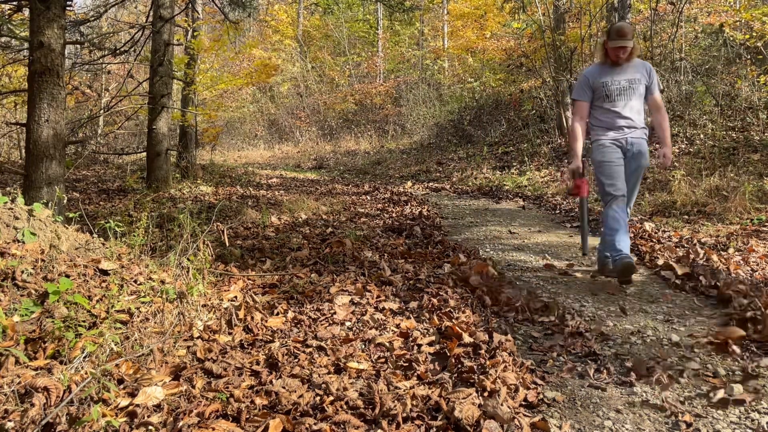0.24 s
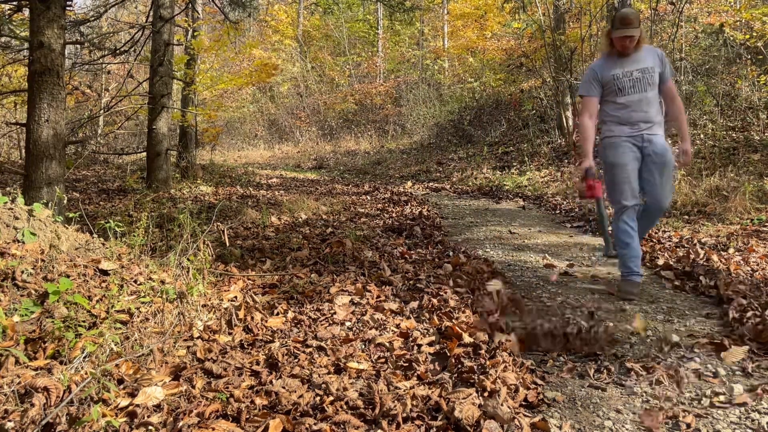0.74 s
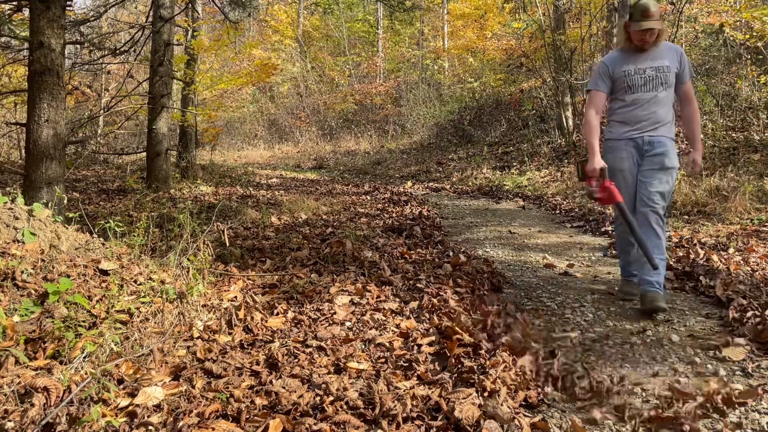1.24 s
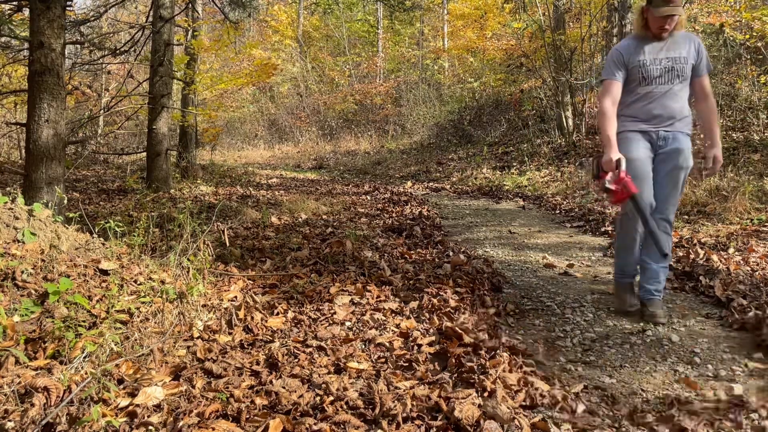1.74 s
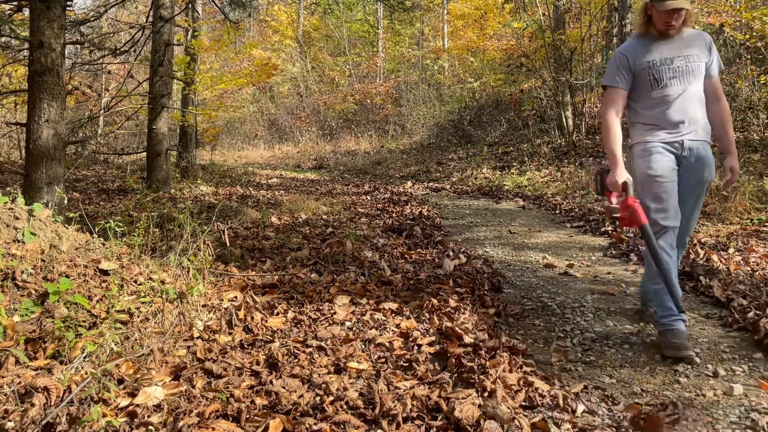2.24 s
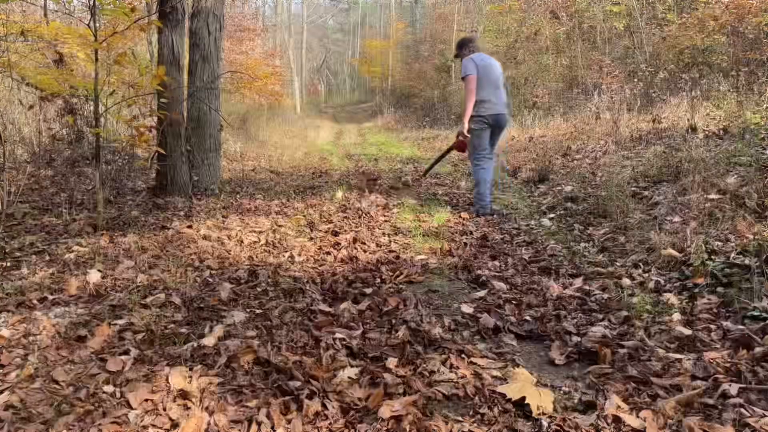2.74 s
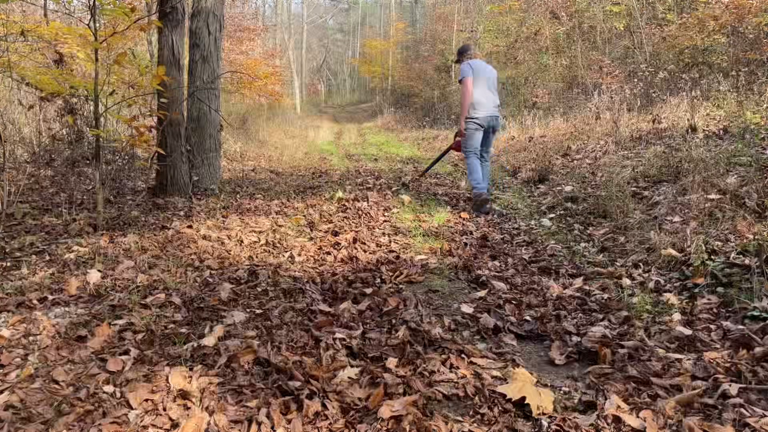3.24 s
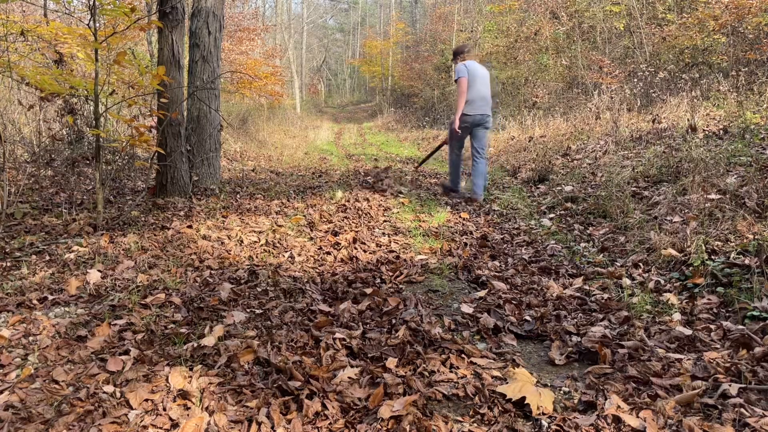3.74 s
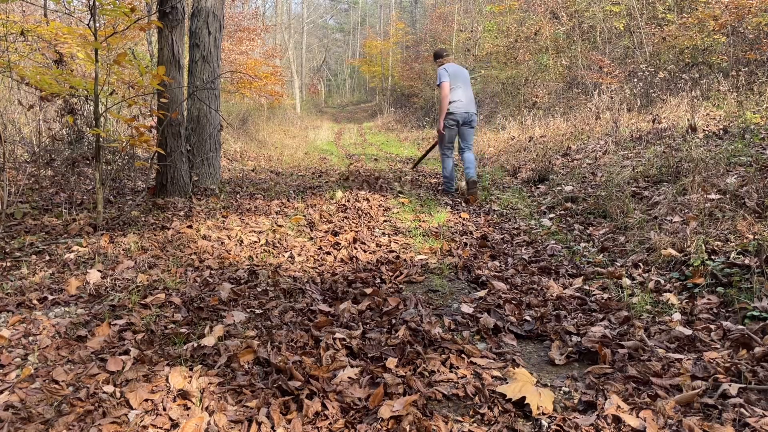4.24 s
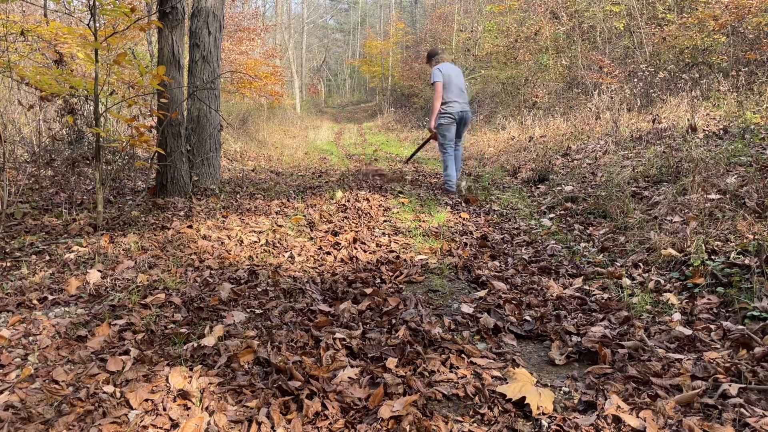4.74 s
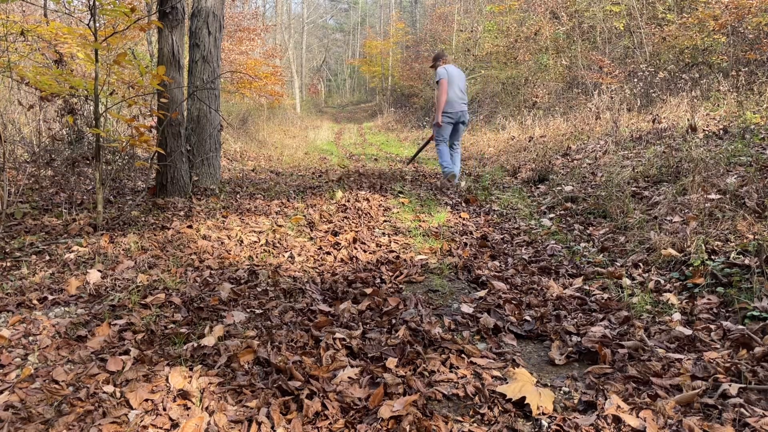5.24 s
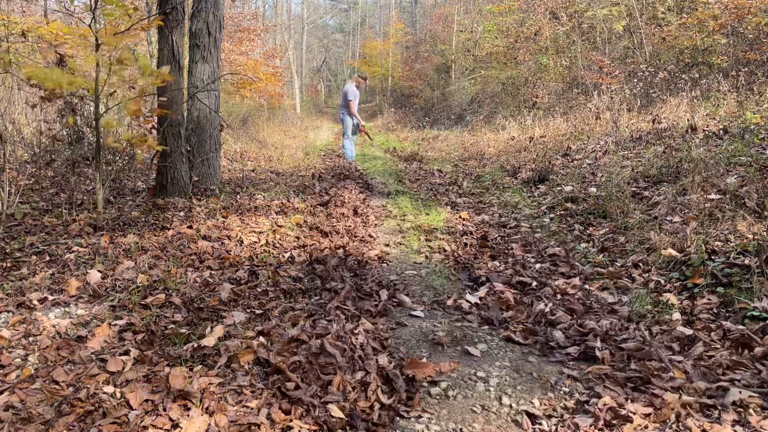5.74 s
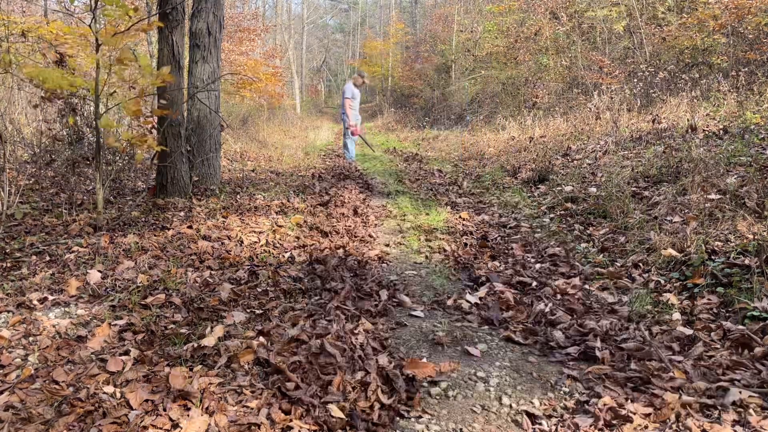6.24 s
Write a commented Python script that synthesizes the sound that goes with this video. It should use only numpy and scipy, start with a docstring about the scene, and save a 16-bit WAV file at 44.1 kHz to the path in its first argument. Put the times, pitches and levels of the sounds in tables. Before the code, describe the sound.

A battery leaf blower runs continuously on a woodland path, heard from three distances with hard jumps between. From 0 to about 2.5 seconds it is close and loud: a dense, gusty rush of air with a resonant tube colour, its tone sweeping as the nozzle swings. A hooting ground roar flares near 0.2 and 1.2 seconds, a whine around 2.7 kHz stands out early and near 1.7, and a hollow moan comes and goes. Dry leaves hiss and tick; a low engine-like drone swells near 2 seconds over dull rumble. At 2.5 it abruptly drops, more distant, with softer air, fluctuating whine until about 4.6, and fading leaf rustle. It dips near 3.5, partly recovers around 4, and wavers. At 5.4 another sudden drop leaves a thin, faraway rush over faint drone, rising slightly until the end at 6.5.

```python
"""On a woodland path a battery leaf blower clears dry leaves, in three shots joined by hard cuts: walking up
close, walking away, and far off. The jet is noise coloured by the blower tube and combed by its own ground echo,
which sweeps as the nozzle swings; bands of noise make its roar on the ground and the fan's intake hiss.
Sines make the fan's hum and whine, a hollow moan and a far engine's drone over a dull rumble;
blown leaves are treble hiss sprinkled with short ticks."""
import sys
import numpy as np
from scipy import signal
from scipy.fft import rfft, irfft, next_fast_len
from scipy.io import wavfile
from scipy.ndimage import uniform_filter1d

SR = 44100
rng = np.random.default_rng(int(sys.argv[2]) if len(sys.argv) > 2 else 0)


def master(y):
    """Save y as 16-bit WAV."""
    cut = np.clip(np.atleast_2d(y).T, -1, 1)
    pcm = np.round(cut * 32767)  # scale
    wavfile.write(sys.argv[1], SR, pcm.astype(np.int16))


N = 285768
T = np.arange(N) / SR
HOP = 512  # samples between noise frames
HZ = np.fft.rfftfreq(4 * HOP, 1 / SR)
FRAME_S = np.arange(N // HOP + 5) * HOP / SR
RUSH_FROM_HZ, RUSTLE_FROM_HZ = 1000, 8700  # the rush level is set above the first; leaf hiss takes over at the second


def gain_of(db):
    """Decibels to amplitude."""
    return 10 ** (np.asarray(db) / 20)


def evened(x):
    """Scales to rms 1."""
    return x / np.sqrt(np.mean(x ** 2) + 1e-20)


def unit_power(power, band):
    """Scales a power spectrum so that the band sums to 1."""
    return power / power[band].sum()


def follow(rows, t):
    """The columns of a curve table at times t, in straight lines from point to point."""
    s, *columns = np.transpose(rows)
    return [np.interp(t, s, c) for c in columns]


def read(points, hz, order=0):
    """One column of a spectrum table on a log-frequency axis."""
    f, *columns = np.transpose(points)
    return np.interp(np.log(hz + 1), np.log(f + 1), columns[order])


def drift(rate_hz):
    """Slow random wander of rms 1: white noise under a Gaussian lowpass."""
    n = next_fast_len(N)
    lowpass = np.exp(-(np.fft.rfftfreq(n, 1 / SR) / rate_hz) ** 2)
    return evened(irfft(rfft(rng.standard_normal(n)) * lowpass, n)[:N])


def patches(size):
    """A random field of rms 1 over frames and bins, smooth over size = (frames, bins)."""
    field = rng.standard_normal((len(FRAME_S), len(HZ)))
    smooth_in_time = uniform_filter1d(field, size[0], 0)
    return evened(uniform_filter1d(smooth_in_time, size[1], 1))


# Air columns of the tube and fan housing. Each row: centre in Hz, width at half the lift in Hz,
# lift in dB before the shot's ring and the treble damping scale it.
TUBE_RESONANCES = [(760, 95, 1.4), (955, 106, 1.2), (1201, 122, 3.3), (1399, 128, 3.5), (1681, 111, 2.7),
                   (1894, 79, 4.2), (2138, 72, 3.4), (2280, 105, 5.0), (2489, 80, 6.0), (2700, 159, 4.5),
                   (2947, 111, 5.0), (3055, 98, 3.7), (3269, 92, 5.0), (3493, 117, 4.8), (3631, 155, 4.3),
                   (3795, 135, 4.1), (4028, 165, 3.5), (4295, 78, 3.4), (4509, 124, 1.9), (4871, 203, 6.9),
                   (5046, 229, 5.0), (5452, 153, 2.4), (5587, 150, 1.9), (5922, 227, 6.5), (6155, 219, 4.7),
                   (6656, 192, 8.4), (6864, 232, 5.7), (7455, 163, 4.3)]


def tube_power(shot, ring=(1.45, 1, .95), damp_hz=(3600, 7500, 9500)):
    """Resonances of the air in the tube; the open nozzle reflects less treble, so the upper ones are flatter."""
    lift_db = sum(lift * .5 ** ((2 * (HZ - hz) / width) ** 2) for hz, width, lift in TUBE_RESONANCES)
    return gain_of(ring[shot] * lift_db / np.sqrt(1 + (HZ / damp_hz[shot]) ** 2)) ** 2


def hump(tube, db, hz, octaves):
    """Power spectrum of a band of noise around hz, coloured by the tube."""
    power = tube * np.exp(-.5 * (np.log2((HZ + 1) / hz) / octaves) ** 2)
    return power / power.sum(axis=-1, keepdims=True) * gain_of(db) ** 2


# Turbulence of the bare jet. Each row: frequency in Hz, then relative density in dB per Hz
# close, walking away, far off.
TURBULENCE_SPECTRUM = [(151, -16.5, -7.5, -4.5), (260, -13, -5.5, -4), (383, -4.5, -6.5, 0),
                       (580, -6, -11.5, -4), (970, -7, -4, -3.5), (1370, -9.5, -7, -6),
                       (1880, -8.5, -10.5, -8), (2240, -9.5, -8.5, -5.5), (3020, -10, -7.5, -6),
                       (3870, -9.5, -13, -9), (4740, -13.5, -15, -10.5), (5450, -10, -12, -5),
                       (6560, -12.5, -15.5, -8.5), (7900, -15.5, -21, -18), (8300, -18.5, -21, -14),
                       (9000, -13.5, -13.5, -12), (12040, -21.5, -25.5, -23.5), (13600, -31, -27, -33),
                       (14900, -31.5, -39, -34)]


def jet_colour(shot, tube):
    """Turbulence spectrum as the tube colours it."""
    return gain_of(read(TURBULENCE_SPECTRUM, HZ, order=shot)) ** 2 * tube


# Jet level as aim and distance change, one curve a shot. Each row: time in seconds, level in dB before trim.
RUSH_LEVEL = [
    [(0, -24), (.6, -23), (1.0, -25), (1.18, -23), (1.43, -27), (1.7, -21), (1.92, -21), (2.12, -25.5),
     (2.28, -22.5), (2.46, -21.5)],
    [(2.46, -29.5), (2.85, -27.5), (3.12, -26), (3.55, -34), (4.02, -29), (4.3, -32.5), (4.62, -35),
     (5.0, -30.5), (5.4, -35)],
    [(5.4, -36.5), (5.7, -39), (6.15, -38), (6.48, -34)],
]


def loudness(shot, t):
    """The jet's usual level in a shot, and its swing about that level at times t, in dB."""
    usual_db = np.mean(RUSH_LEVEL[shot], axis=0)[1]
    return usual_db, follow(RUSH_LEVEL[shot], t)[0] - usual_db


# Starts of the three shots and the end of the last, in seconds.
SHOT_CUTS = [0, 2.462, 5.4, 6.5]
# The treble beams along the tube, so it follows the aim more than the bass. Each row: frequency in Hz,
# then share of the swing in level close, walking away, far off.
BEAM_SHARE = [(300, .08, 0.49, .08), (716, 0.1, 0.95, .02), (1600, 1.02, 0, 0.2), (3000, 0.49, 0.59, 0.77),
              (5800, 0.84, 0.79, 2.1)]


def rush_power(shot, colour, t, trim_db=(0.1, -.6, .1)):
    """The jet's rush below the leaf hiss; it brightens as the blower comes up to the microphone."""
    brighten_db_per_octave_s, pivot_hz = 0.5, 3100
    usual_db, aim_db = loudness(shot, t)
    rush_db = usual_db + trim_db[shot] + read(BEAM_SHARE, HZ, order=shot) * aim_db
    if shot == 0:
        octaves = np.log2(np.maximum(HZ, RUSH_FROM_HZ) / pivot_hz)
        rush_db = rush_db + brighten_db_per_octave_s * (t - SHOT_CUTS[1] / 2) * octaves
    return unit_power(colour * (HZ <= RUSTLE_FROM_HZ), HZ > RUSH_FROM_HZ) * gain_of(rush_db) ** 2


# Rustle of blown leaves, one curve a shot. Each row: time in seconds, level of the hiss in dB.
RUSTLE_LEVEL = [
    [(0, -41), (0.85, -38), (1.5, -40.5), (1.7, -36.5), (2.2, -40), (2.46, -33)],
    [(2.46, -42.5), (3.27, -43.5), (3.55, -49.5), (5.4, -50)],
    [(5.4, -54.5), (6.15, -56), (6.48, -49.5)],
]


def leaf_hiss_power(shot, colour, t, clump_db=1.3):
    """Blown leaves merge into treble hiss, uneven as they come in clumps."""
    leafy = HZ > RUSTLE_FROM_HZ
    level_db = follow(RUSTLE_LEVEL[shot], t)[0] + clump_db * patches(size=(8, 250))
    return unit_power(colour * leafy, leafy) * gain_of(level_db) ** 2


# Roar of the jet striking the ground, at times narrowing to a hoot, one curve a shot.
# Each row: time in seconds, level in dB, centre in Hz, width in octaves (standard deviation).
GROUND_ROAR = [
    [(0, -46, 1210, .08), (.19, -31.5, 1240, .07), (.4, -41, 1100, 0.18), (.7, -34.5, 734, 0.53),
     (1.08, -33.5, 730, 0.19), (1.17, -30.5, 950, 0.33), (1.23, -28, 1186, 0.041), (1.3, -42, 1250, .12),
     (1.37, -35, 840, 0.25), (1.5, -29, 755, 0.34), (1.8, -37.5, 664, 0.23), (2.05, -28.5, 705, 0.3),
     (2.46, -30, 697, 0.39)],
    [(2.46, -37.5, 1080, .25), (3.3, -37, 1270, 0.23), (3.6, -40.5, 1340, 0.23), (4.1, -47, 1310, 0.27),
     (4.85, -40, 1140, 0.17), (5.4, -39.5, 1450, 0.24)],
    [(5.4, -64, 1000, .4), (5.8, -45.5, 1250, 0.31), (6.48, -55, 700, 0.33)],
]


def roar_power(shot, tube, t):
    """The jet lands on the ground and roars in a band that moves and changes width."""
    return hump(tube, *follow(GROUND_ROAR[shot], t))


# Fan settings. Each row, one a shot: mean speed in turns per second, Doppler sway in turns per second,
# twice-a-turn hum in dB, trim of the blade whine in dB, intake hiss over the untrimmed whine in dB,
# centre of that hiss in Hz.
FAN_SETTINGS = [(299.6, 0.765, -48, -4.5, -7, 2600), (300.4, 1.36, -60, -5, -4.5, 2950),
                (298, 0.24, -71, -2, -4, 2900)]
# Blade whine, one curve a shot. Each row: time in seconds, level in dB before trim.
WHINE_LEVEL = [
    [(0, -32.5), (.5, -32), (.8, -40), (1.55, -41), (1.66, -32), (1.8, -41), (2.1, -41), (2.3, -35),
     (2.46, -39)],
    [(2.46, -37), (2.7, -34), (3.0, -37), (3.45, -43.5), (4.0, -36.5), (4.2, -50), (4.48, -37), (4.8, -60),
     (5.4, -52)],
    [(5.4, -55), (6.25, -58), (6.48, -43)],
]


def intake_power(shot, tube, t, octaves=0.092):
    """Air drawn into the fan hisses in a narrow band that swells with the whine."""
    *_, intake_db, intake_hz = FAN_SETTINGS[shot]
    return hump(tube, follow(WHINE_LEVEL[shot], t)[0] + intake_db, intake_hz, octaves)


# Turning points of the nozzle's swings, one list a shot. Each row: time in seconds,
# lag of the ground echo in ms, its strength from 0 to 1 before the ground's treble response.
NOZZLE_SWINGS = [
    [(0, .38, .45), (.25, .352, .33), (.4, .377, .41), (.59, .384, .45), (.827, .547, .42), (1, .462, .25),
     (1.167, .504, .43), (1.486, .337, .33), (1.781, .87, .48), (2.207, .475, .34), (2.39, .584, .33)],
    [(2.46, .34, .2), (2.95, .345, .22), (3.4, .27, .05), (3.9, .25, .19), (4.4, .2, .12), (4.9, .235, .13),
     (5.4, .19, .18)],
    [(5.4, .19, .18), (6.48, .21, .05)],
]


def nozzle(shot, t):
    """Lag in seconds and strength of the ground echo, easing from swing to swing."""
    s, ms, share = np.transpose(NOZZLE_SWINGS[shot])
    count = np.arange(len(s))
    swing, part = np.divmod(np.interp(t, s, count), 1)
    place = swing + np.sin(np.pi / 2 * part) ** 2
    return np.interp(place, count, ms) / 1000, np.interp(place, count, share)


def ground_echo(sound, shot, turn=1.04, soft_hz=9750, again=.5, again_turn=-1.4):
    """Comb of direct sound, bounce and weaker second bounce; leaf litter turns their phase and soaks up treble."""
    hz, t, z = signal.stft(sound, SR, nperseg=HOP)
    hz = hz[:, None]
    lag, share = nozzle(shot, t)
    path = np.exp(1j * (2 * np.pi * hz * lag + turn))
    bounce = share * (1 + .3 * hz / soft_hz) / (1 + (hz / soft_hz) ** 6)
    second = again * bounce ** 2
    mixed = abs(1 + bounce * path + second * np.exp(1j * again_turn) * path ** 2)
    comb = mixed / np.sqrt(1 + bounce ** 2 + second ** 2)  # only the level of each band changes
    return signal.istft(z * comb, SR, nperseg=HOP)[1][:, :N]


# Left minus right, one list a shot and a last for up close once the nozzle has crossed over.
# Each row: frequency in Hz, difference in dB.
STEREO_BALANCE = [
    [(500, 1.6), (1100, -.8), (1400, -.6), (1720, -2.3), (2100, 0), (2700, 2.4), (3250, 5.6), (4480, 6.2),
     (4950, 14), (5300, 12.5), (6400, 3.5), (6750, 3.8), (7800, 0)],
    [(600, 1.9), (1100, .5), (1800, 0), (2400, 1.6), (3600, 2), (4300, .9), (5000, 2.3), (5900, .2),
     (6900, 1.7), (7800, 0)],
    [(200, 1.4), (1100, 2.8), (1700, .8), (2100, 2.8), (2900, 1.9), (5000, 4), (6100, 2.2), (6800, 3.8),
     (7800, 0)],
    [(350, 1.4), (850, -1), (1750, -2), (2500, 3), (2950, 8), (3600, 10.8), (4300, 10.6), (4700, 7.5),
     (6000, .8), (6700, 1.8), (7800, 0)],
]
# Phase between left and right; above 7.7 kHz set band by band: opposed, alike, opposed.
# Each row: frequency in Hz, then left lead in radians close, walking away, far off, crossed over.
STEREO_LEAD = [(200, 0, 0, .1, 0), (700, -.35, -.17, .2, -.5), (1700, -.6, -.05, 0, -.75),
               (2300, 0, .2, .5, -.75), (3000, 0, .65, 1.1, -.05), (4000, 0, .05, .6, .15),
               (4600, -.55, .3, 1, 1.75), (4900, -.4, .65, 1.3, 1.8), (5300, .7, .2, 1.2, 1.2),
               (6000, -.2, 0, .1, .1), (6900, -1.6, -1.1, -1.25, -1.2), (7750, -3.13, -3.13, -3.13, -3.13),
               (8750, -3.15, -3.15, -3.15, -3.15), (10600, -6.2, -6.2, -6.2, -6.2),
               (13000, -6.4, -6.6, -6.4, -6.4), (13700, -9.42, -9.42, -9.42, -9.42)]
# Likeness of left and right; in the treble set by band. Each row: frequency in Hz, then likeness from 0 to 1
# close, walking away, far off, crossed over.
STEREO_LIKENESS = [(200, .98, .98, .97, .98), (700, .82, .8, .48, .9), (1400, .95, .96, .84, .92),
                   (2800, .98, .93, .9, .86), (3800, .97, .94, .85, .75), (4400, .76, .9, .8, .4),
                   (5100, .57, .87, .89, .83), (6000, .76, .98, .92, .96), (7200, .77, .63, .7, .72),
                   (7800, 1, 1, 1, 1), (8700, 1, 1, 1, 1), (10700, .93, .93, .93, .93), (13800, 1, 1, 1, 1)]


def stereo_image(shot):
    """Gain, phase and likeness of left and right by band; up close they shift as the nozzle crosses over."""
    cross_s, cross_takes_s = 1.2, 0.058
    crossed = (.5 + .5 * np.tanh((FRAME_S[:, None] - cross_s) / cross_takes_s)) * (shot == 0)

    def blend(before, after):
        return (1 - crossed) * before + crossed * after

    balance_db = blend(read(STEREO_BALANCE[shot], HZ), read(STEREO_BALANCE[-1], HZ))
    lead = blend(read(STEREO_LEAD, HZ, order=shot), read(STEREO_LEAD, HZ, order=-1))
    same = blend(read(STEREO_LIKENESS, HZ, order=shot), read(STEREO_LIKENESS, HZ, order=-1))
    left = gain_of(balance_db / 2) * np.exp(.5j * lead)
    pair = np.array([left, 1 / left])
    return pair / np.sqrt(np.mean(abs(pair) ** 2, axis=0)), np.clip(same, 0, 1)


def turbulence(size, pair, same):
    """Stereo noise with the given amplitude over frames and bins."""
    a, b = rng.standard_normal((2, *size.shape)) + 1j * rng.standard_normal((2, *size.shape))
    right = same * a + np.sqrt(1 - same ** 2) * b  # partly shared with the left
    z = np.array([a, right]) * pair * size
    sound = signal.istft(z.transpose(0, 2, 1), nperseg=4 * HOP, noverlap=3 * HOP)[1][:, :N]
    return np.sqrt(3) / 2 * sound  # makes up for the overlap of the frames


def jet(shot, eddy_db=(1.1, 1.1, 1), flutter_db=0.6):
    """Gusty air noise: the rush meets its ground echo; leaf hiss, ground roar and intake are added without it."""
    t = FRAME_S[:, None]
    tube = tube_power(shot)
    colour = jet_colour(shot, tube)
    rush = rush_power(shot, colour, t)
    unechoed = leaf_hiss_power(shot, colour, t) + roar_power(shot, tube, t) + intake_power(shot, tube, t)
    gusts = gain_of(eddy_db[shot] * patches(size=(9, 6)) + flutter_db * patches(size=(5, 300)))
    pair, same = stereo_image(shot)
    echoed_sound = ground_echo(turbulence(np.sqrt(rush) * gusts, pair, same), shot)
    return echoed_sound + turbulence(np.sqrt(unechoed) * gusts, pair, same)


# Once-a-turn hum, one curve a shot. Each row: time in seconds, level in dB.
HUM_LEVEL = [
    [(0, -57), (.8, -54), (1.15, -43.5), (1.55, -49.5), (2.0, -65), (2.46, -53)],
    [(2.46, -51), (3.0, -45), (3.55, -53), (3.85, -48.5), (4.2, -49.5), (4.5, -55), (4.75, -52), (5.0, -56),
     (5.2, -48), (5.4, -54)],
    [(5.4, -61), (5.8, -51), (6.15, -56.5), (6.35, -65)],
]


def fan(shot, wander=0.00125, flicker_db=1.2, octave_follows=0.63, left_db=0.5):
    """A slightly unbalanced rotor hums and its blades whine; the arm's swing bends the pitch, each tone flickers."""
    blades = 9
    stride_s, forward_s = 0.99, 3.77  # one arm swing a stride, fastest towards the microphone at forward_s
    speed, sway, octave_db, whine_db, *_ = FAN_SETTINGS[shot]
    aim_db = loudness(shot, T)[1]
    swing = sway * np.cos(2 * np.pi * (T - forward_s) / stride_s)
    turns = np.cumsum((speed + swing) * (1 + wander * drift(11.5))) / SR
    tones = [(1, follow(HUM_LEVEL[shot], T)[0]),
             (2, octave_db + octave_follows * aim_db),
             (blades, follow(WHINE_LEVEL[shot], T)[0] + whine_db)]
    sound = sum(gain_of(db + flicker_db * drift(6.9)) * np.sin(2 * np.pi * k * turns) for k, db in tones)
    return np.sqrt(2) * sound * gain_of([[left_db], [-left_db]])


def leaves(shot, per_s=600, spread_db=7.0, level_db=-14.5):
    """Tumbling dry leaves tick softly against each other, many faintly and a few louder, under the leaf hiss."""
    t, out = np.arange(256) / SR, np.zeros((2, N))
    tick = t * np.exp(-t / .00018)
    pitches_hz = np.geomspace(3500, 11000, num=12)
    for hz in pitches_hz:
        strikes = rng.random(N) < per_s / len(pitches_hz) / SR
        size = gain_of(spread_db * np.minimum(rng.exponential(1, N), 3.5)) * strikes
        lead = read(STEREO_LEAD, hz, order=shot) * np.array([[.5], [-.5]])
        ping = tick * np.sin(2 * np.pi * hz * t + lead)
        out += signal.oaconvolve(size[None], ping, axes=1)[:, :N]
    return evened(out) * gain_of(follow(RUSTLE_LEVEL[shot], T)[0] + level_db)


# Steady crank speed of the far engine in each shot, in turns per second.
CRANK_SPEED = [26, 20.5, 20.2]
# Far engine level, one curve a shot. Each row: time in seconds, level in dB before the level of each order.
ENGINE_LEVEL = [
    [(0, -55), (1.4, -45), (1.65, -33), (2.05, -24.5), (2.46, -30)],
    [(2.46, -51), (2.9, -45), (3.4, -42), (4.1, -37), (4.7, -39.5), (5.4, -39)],
    [(5.4, -52), (6.1, -48), (6.48, -40)],
]
# Engine orders, one list a shot. Each row: multiple of the crank speed, level in dB over the engine curve.
ORDER_LEVELS = [
    [(2, -15), (3, -2), (4, -26), (6, -24.5)],
    [(3, -5.5), (4, -4.5), (5, -13)],
    [(3, -3), (4, -6)],
]


def engine_drone(shot, waver_db=2.0):
    """Only the lowest orders of a distant engine carry through the trees, each wavering in level."""
    level_db, turns = follow(ENGINE_LEVEL[shot], T)[0], CRANK_SPEED[shot] * T
    drone = np.zeros(N)
    for k, db in ORDER_LEVELS[shot]:
        size = gain_of(level_db + db + waver_db * drift(3.4))
        drone += size * np.sin(2 * np.pi * (k * turns + rng.random()))
    return np.sqrt(2) * drone


# Low background level in each shot, in dB.
RUMBLE_LEVEL = [-32.5, -43, -46.5]
# Low background spectrum. Each row: frequency in Hz, relative density in dB per Hz.
RUMBLE_SPECTRUM = [(12, -50), (25, -25), (40, -15), (55, 2), (72, -1.5), (95, -4), (130, -16), (220, -19),
                   (300, -19), (480, -122)]


def low_rumble(shot):
    """Dull background: white noise shaped down to its lowest octaves."""
    shape = gain_of(read(RUMBLE_SPECTRUM, np.fft.rfftfreq(N, 1 / SR)))
    return evened(irfft(rfft(rng.standard_normal(N)) * shape, N)) * gain_of(RUMBLE_LEVEL[shot])


def far_background(shot):
    """Engine drone over the rumble, a little louder on the left."""
    return (engine_drone(shot) + low_rumble(shot)) * gain_of([[.7], [-.7]])


# A hollow tone that comes and goes near the blower. Each row: time in seconds, level in dB.
MOAN_LEVEL = [(0, -66), (.5, -43.5), (1.15, -54), (1.45, -43.5), (1.75, -56), (2.05, -38.5), (2.46, -49)]


def moan(wobble=.011, flicker_db=2.5, left_db=1):
    """An unsteady hollow tone that slowly sags in pitch, heard only up close."""
    start_hz, sag_hz_per_s = 509, 11
    hz = (start_hz - sag_hz_per_s * T) * (1 + wobble * drift(34))
    size = gain_of(follow(MOAN_LEVEL, T)[0] + flicker_db * drift(16.0)) * (T < SHOT_CUTS[1])
    tone = np.sqrt(2) * size * np.sin(2 * np.pi * np.cumsum(hz) / SR)
    return tone * gain_of([[left_db], [-left_db]])


def scene():
    """The three shots, cut hard one after another, and the moan of the first."""
    out = np.zeros((2, N))
    for shot in range(len(RUSH_LEVEL)):
        within = (T >= SHOT_CUTS[shot]) & (T < SHOT_CUTS[shot + 1])
        out += (jet(shot) + fan(shot) + leaves(shot) + far_background(shot)) * within
    return out + moan()


def record(dry):
    """The recorder's band limit: a steep lowpass."""
    edge_hz = 15800
    lowpass = signal.firwin(511, edge_hz, window=("kaiser", 9), fs=SR)
    return signal.oaconvolve(dry, lowpass[None], "same")


dry = scene()
out = record(dry)
master(out)
```